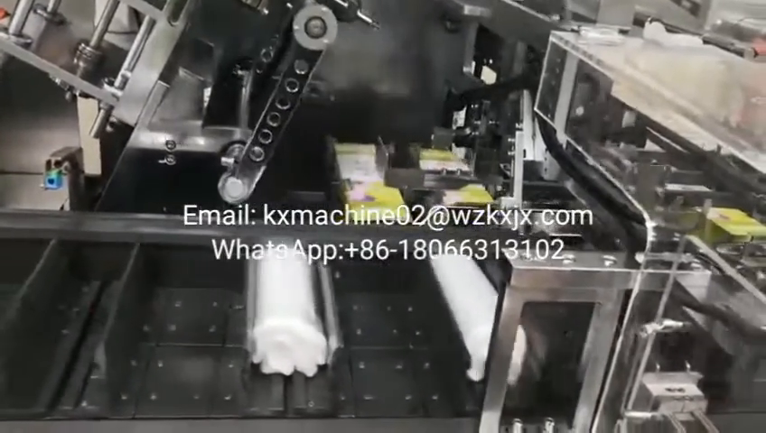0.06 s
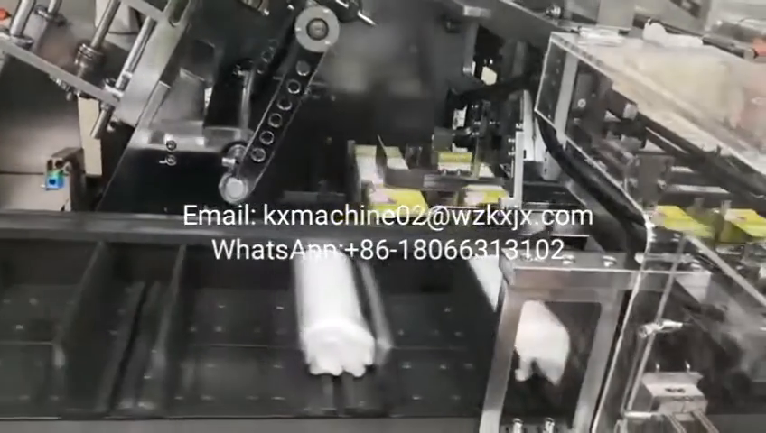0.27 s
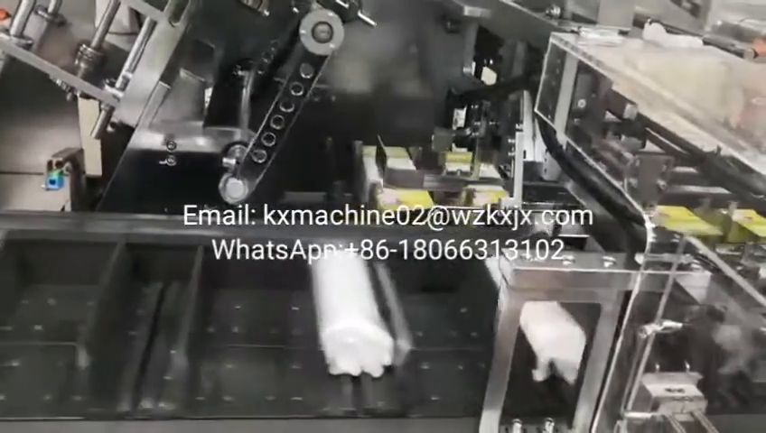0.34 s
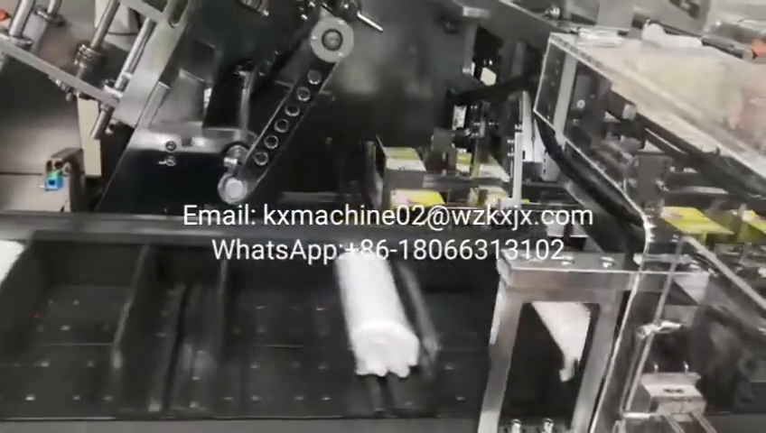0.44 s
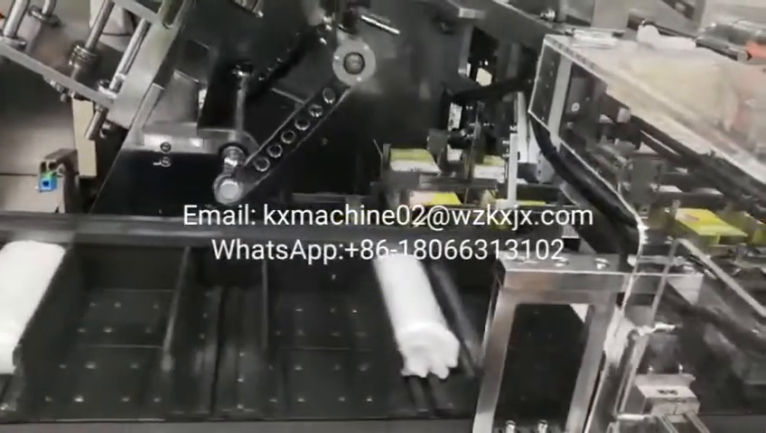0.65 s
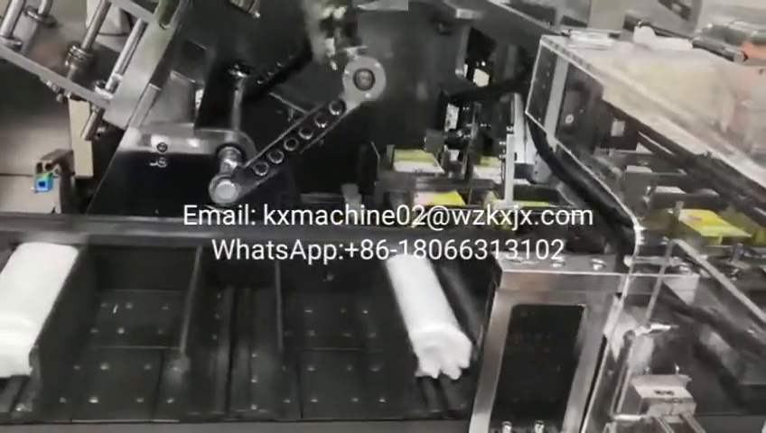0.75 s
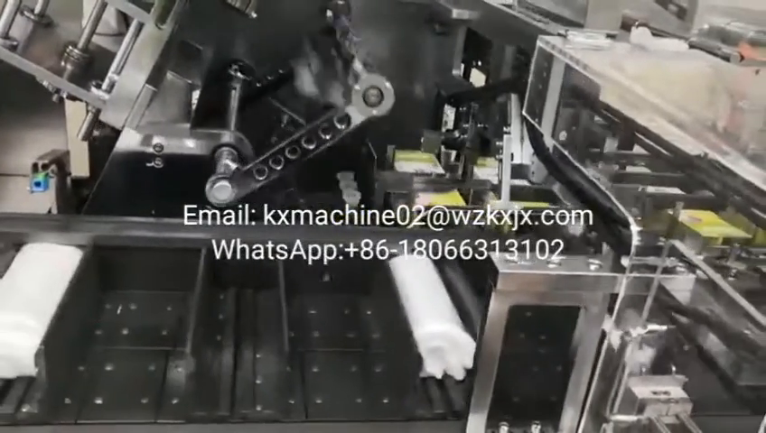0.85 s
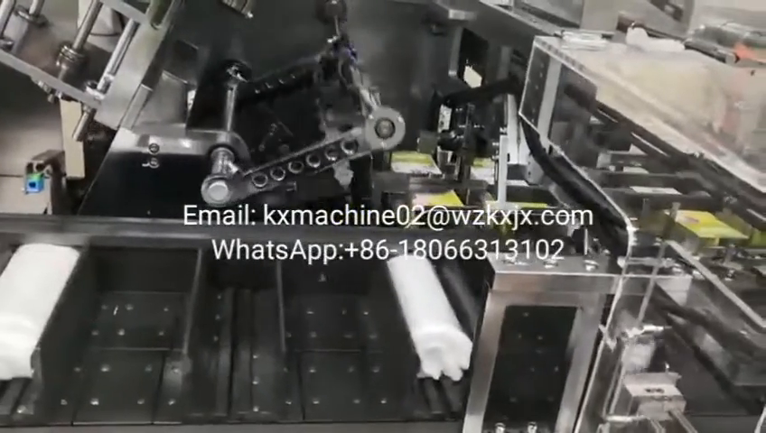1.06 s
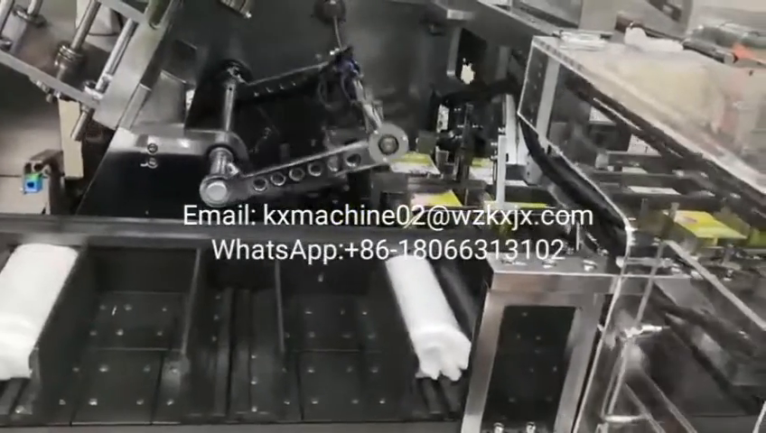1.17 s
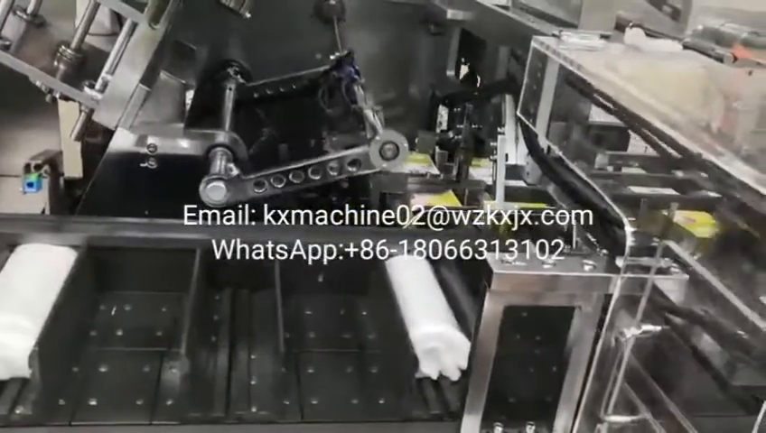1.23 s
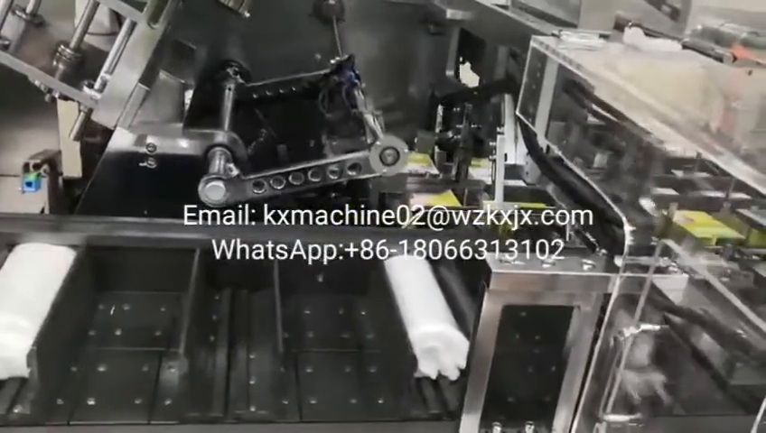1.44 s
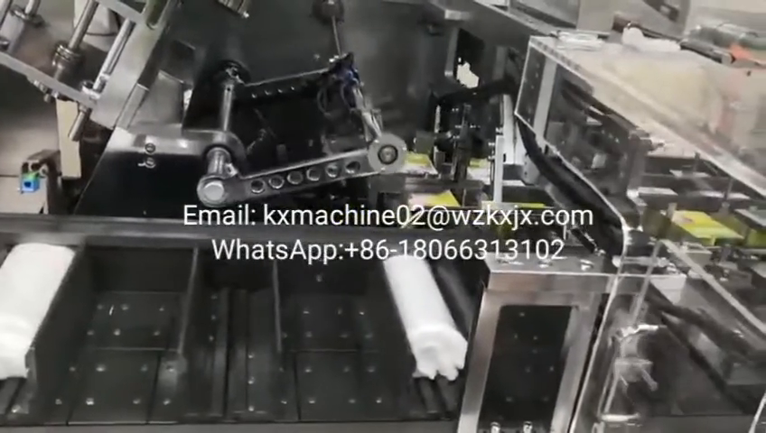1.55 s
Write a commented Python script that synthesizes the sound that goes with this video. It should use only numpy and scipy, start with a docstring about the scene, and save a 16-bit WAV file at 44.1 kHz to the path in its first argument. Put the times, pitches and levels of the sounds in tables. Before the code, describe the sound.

A packing machine runs one cycle. A carriage rolls along its rail with a dull thump, air hisses out, then a steel arm clanks, bounces and rubs briefly. A steady factory hum and thin drive whine continue underneath.

```python
"""A packing machine goes through one cycle over the steady hum and wash of a factory.
First a carriage rolls along its rail, swelling and slowing, with a dull thump of the frame.
Then a valve spits and air hisses out. A steel arm clanks on its stop, bounces and runs on briefly.
Last comes a faint leak of air, and the whine of the drive swells for a moment."""
import sys
import numpy as np
from scipy import signal
from scipy.fft import rfft, irfft
from scipy.io import wavfile
from scipy.ndimage import uniform_filter1d

SR = 44100
rng = np.random.default_rng(int(sys.argv[2]) if len(sys.argv) > 2 else 0)


def unload_wav(signal):
    """Save mono or channel-first audio to the path in sys.argv[1] as 16-bit WAV at rate SR, clipped to [-1, 1]."""
    wavfile.write(
        sys.argv[1],
        SR,
        np.round(np.clip(np.atleast_2d(signal).T, -1, 1) * 32767).astype(np.int16),
    )


N = 70560
T = np.arange(N) / SR


def amp(db):
    """Turns decibels into a number to multiply by."""
    return 10 ** (np.asarray(db) / 20)


def unit(x):
    """Scales a signal to an average power of 1."""
    return x / np.sqrt(np.mean(x ** 2) + 1e-20)


def noise():
    """Fresh white noise: an even hiss."""
    return rng.standard_normal(N)


def at_pitch(points, hz):
    """Looks up values between a table's pitches, giving each octave equal room."""
    pitches, values = np.transpose(points)
    return np.interp(np.log(hz + 1), np.log(pitches + 1), values)


def loudness(points):
    """Joins (time_s, level_db) points into a volume curve, silent before and after."""
    return amp(np.interp(T, *np.transpose(points), left=-120, right=-120))


def wander(rate_hz):
    """A smooth random wobble; a higher rate makes it quicker."""
    hz = np.fft.rfftfreq(N, 1 / SR)
    return unit(irfft(rfft(noise()) * np.exp(-(hz / rate_hz) ** 2), N))


def colour(x, points):
    """Sets the balance of low and high pitches in x, at power 1."""
    hz = np.fft.rfftfreq(N, 1 / SR)
    return unit(irfft(rfft(x) * amp(at_pitch(points, hz)), N))


def resonances(x, peaks):
    """Keeps the narrow bands of x where a part likes to ring, at power 1."""
    hz = np.fft.rfftfreq(N, 1 / SR)
    power = sum(amp(db) ** 2 / width / (1 + ((hz - pitch) / (0.74 * width)) ** 2) ** 2
                for pitch, width, db in peaks)
    return unit(irfft(rfft(x) * np.sqrt(power), N))


def decay(start_s, fade_s, rise_s):
    """A quick rise and a fall of 60 dB every fade_s seconds."""
    age = np.maximum(T - start_s, 0)
    return np.minimum(age / rise_s, 1) * 10 ** (-3 * age / fade_s)


def ring(start_s, notes, rise_s):
    """One blow sets a part's own notes ringing, each fading at its own pace."""
    size = np.sqrt(sum(amp(db) ** 2 for _, db, _ in notes) / 2)
    return sum(amp(db) * decay(start_s, fade_s, rise_s) * np.sin(2 * np.pi * (hz * T + rng.random()))
               for hz, db, fade_s in notes) / size


def tones(lines, waver_hz=3.5):
    """Steady tones that waver a little in pitch."""
    sound = np.zeros(N)
    for hz, db in lines:
        cycles = np.cumsum(hz + waver_hz * wander(14.2)) / SR + rng.random()
        sound += amp(db) * np.sqrt(2) * np.sin(2 * np.pi * cycles)
    return sound


def factory():
    """Distant machines blur into a wash, a motor hums and the drive whines."""
    # tone colour of the wash: pitch_hz, level_db
    wash_colour = [(15, -47), (25, -18.5), (45, -9), (69, -1), (110, -5), (160, -2.5), (313, -5.5),
                   (410, -11), (650, -18.5), (804, -17.5), (1170, -8.5), (1370, -11.5), (1660, -5.5),
                   (2850, -8), (3340, -7), (4300, -13.5), (5730, -21.5), (6400, -30), (7700, -40.5),
                   (8580, -54), (15500, -68)]
    # motor tones: pitch_hz, level_db
    hum_tones = [(72, -65), (134.6, -61.5), (200, -65.5), (262, -60.5), (1712, -63.5)]
    # drive tones, before the swell scales them: pitch_hz, level_db
    whine_tones = [(3285, -61.5), (3405, -46), (3467, -55)]
    bands = signal.stft(noise(), nperseg=1024, noverlap=768)[2]
    patches = uniform_filter1d(rng.standard_normal(bands.shape), size=10, axis=0)
    drift_db = 1.5 * unit(uniform_filter1d(patches, size=10, axis=1))
    room_db = 3 * rng.standard_normal((len(bands), 1))  # the room favours some pitches
    wash = signal.istft(bands * amp(drift_db + room_db), nperseg=1024, noverlap=768)[1][:N]
    swell = 0.36 + 0.44 * np.exp(-((T - 1.435) / 0.084) ** 2)  # peaks at 1.435 s
    return amp(-39.5) * colour(wash, wash_colour) + tones(hum_tones) + tones(whine_tones) * swell


def frame():
    """Soft blows knock and ring the frame, which rumbles while the drive works hard."""
    # tone colour of the rumble: pitch_hz, level_db
    rumble_colour = [(20, -28.5), (45, -8), (75, 1.5), (110, -2), (150, 0), (260, -8), (450, -32.5),
                     (1500, -66)]
    # rumble under load: time_s, level_db
    rumble_levels = [(.1, -77), (.21, -45), (.58, -56.5), (.7, -46.5), (.8, -41.5), (.9, -48), (1.03, -45),
                     (1.12, -73)]
    # tone colour of a muffled knock: pitch_hz, level_db
    knock_colour = [(30, -11), (90, 3.5), (250, -3), (400, -4), (620, -8), (900, -20), (1400, -15.5),
                    (1750, -1), (2300, -17.5), (6000, -53.5)]
    # blows on the frame: start_s, level_db
    thumps = [(0.324, -37.5), (.462, -20.5), (0.756, -40)]
    # the frame's own notes: pitch_hz, level_db, fade_s
    frame_notes = [(84, -9, 0.18), (135, -10, 0.18), (190.2, 0, .17), (204.5, -2, 0.2), (245.6, -11, 0.41),
                   (331, -14, 0.19)]
    sound = loudness(rumble_levels) * colour(noise(), rumble_colour)
    knock_noise = amp(-5) * colour(noise(), knock_colour)
    for start_s, db in thumps:
        knock = knock_noise * decay(start_s, fade_s=0.23, rise_s=0.0051)
        sound += amp(db) * (knock + ring(start_s, frame_notes, rise_s=0.0072))
    return sound


def carriage():
    """Grainy rolling rings the rail: bright as the carriage sets off, dull as it slows."""
    # tone colour of the rolling: pitch_hz, level_db
    roll_colour = [(40, -34), (140, -0.5), (260, -6.5), (450, -19.5), (800, -21), (1450, -23.5),
                   (2100, -11), (2500, 2), (4000, -2), (5500, -9.5), (6500, -20), (7700, -29),
                   (8500, -41.5), (11000, -56), (15000, -58)]
    # where the rail rings: pitch_hz, width_hz, level_db
    rail_peaks = [(1157, 110, -12.5), (1796, 143, -0.5), (2703, 190, -1), (3580, 70, -6.5), (4180, 91, -4),
                  (4730, 92, -16)]
    # speed heard as loudness: time_s, level_db
    travel_levels = [(.10, -69), (.19, -39.5), (.25, -31), (.30, -25), (.35, -22), (.42, -22), (.49, -25),
                     (.55, -30.5), (.61, -38.5), (.67, -54)]
    # boost or cut of the treble: time_s, level_db
    treble_levels = [(.09, -5), (.23, 3), (.38, 1.5), (.49, -2), (.57, -9.5), (.68, -18)]
    contact = noise() * amp(wander(500))
    rolling = amp(-1.5) * colour(contact, roll_colour) + amp(-8.5) * resonances(contact, rail_peaks)
    body = signal.sosfiltfilt(signal.butter(3, 5000, fs=SR, output="sos"), rolling)  # below 5000 Hz
    treble = (rolling - body) * loudness(treble_levels)
    return loudness(travel_levels) * (body + treble)


def air_valve():
    """Escaping air makes thin spits, a faint leak and a broad exhaust hiss."""
    # spits at the valve: start_s, level_db, fade_s
    spits = [(.134, -70, .13), (.461, -70, .13), (.7435, -56, 0.11), (.763, -47, 0.15), (0.75, -58, .07),
             (1.155, -71, .1)]
    # thin leak: time_s, level_db
    leak_levels = [(1.05, -92), (1.16, -76), (1.26, -79), (1.31, -98)]
    # tone colour of spits and leak: pitch_hz, level_db
    spit_colour = [(3000, -8.5), (7000, 0), (9000, -17), (10500, -18), (12500, -10), (14400, 1.5),
                   (15500, -5)]
    # exhaust puffs: start_s, length_s, level_db, growth_db_per_s
    puffs = [(0.139, .02, -45, -10), (0.739, 0.012, -44.5, 5), (0.757, 0.11, -34.5, 71)]
    # tone colour of the exhaust: pitch_hz, level_db
    exhaust_colour = [(600, -23.5), (1200, -5), (1750, 0), (3000, 0.5), (4500, 3), (5700, -2), (6400, -15),
                      (7900, -21.5), (8700, -33), (12000, -45.5), (15000, -41)]
    spitting = sum(amp(db) * decay(start_s, fade_s, rise_s=0.003) for start_s, db, fade_s in spits)
    thin_hiss = (spitting + loudness(leak_levels)) * colour(noise(), spit_colour)
    puff_rise_s, puff_fade_s = 0.01, 0.32
    flow = np.zeros(N)
    for start_s, length_s, db, growth in puffs:
        age = np.maximum(T - start_s, 0)
        grown_db = growth * np.minimum(age, length_s)
        faded_db = 60 * np.maximum(age - length_s, 0) / puff_fade_s
        flow += np.minimum(age / puff_rise_s, 1) * amp(db + grown_db - faded_db)
    rough_air = noise() * amp(1.2 * wander(200))
    return thin_hiss + flow * colour(rough_air, exhaust_colour)


def clank(start_s):
    """Steel hits steel: a sharp crack, then the panels and the arm ring."""
    # tone colour of the panels and the crack: pitch_hz, level_db
    panel_colour = [(100, -21), (350, -14), (620, -11.5), (950, -5), (1300, -9.5), (1750, 0.5), (2500, -1),
                    (4000, -4), (5500, -13), (7700, -24), (8600, -42), (12000, -50), (15000, -43)]
    # how long the panels ring: pitch_hz, fade_s
    panel_fades = [(300, 0.56), (700, 0.35), (2200, 0.54), (4000, 0.54), (7000, 0.28), (12000, 0.13)]
    # the arm's own notes: pitch_hz, level_db, fade_s
    arm_notes = [(945, -4, 0.066), (1023, -8, 0.25), (1672, -3, 0.28), (1682, 0.5, 0.17), (1805, 2.5, .12),
                 (1985, 2.5, 0.19), (2541, -21.5, 0.44), (2967, -1, 0.2), (3655, -5, 0.12),
                 (3825, -2, 0.28), (4510, -6, 0.19), (4440, -4, .12)]
    hz, times, bands = signal.stft(colour(noise(), panel_colour), SR, nperseg=256)
    fading = amp(-60 * np.maximum(times - start_s, 0) / at_pitch(panel_fades, hz)[:, None])
    onset = np.clip((T - start_s) / 0.0037, 0, 1)
    panels = onset * signal.istft(bands * fading, SR, nperseg=256)[1][:N]
    crack = colour(noise(), panel_colour) * decay(start_s, fade_s=0.058, rise_s=0.0006)
    return amp(-3) * crack + amp(-5.5) * panels + amp(-2.5) * ring(start_s, arm_notes, rise_s=0.00038)


def arm():
    """The arm hits its stop and bounces, and its joints rub as it runs on."""
    # blows on the stop: start_s, level_db
    blows = [(.851, -18), (0.8604, -17), (0.907, -29)]
    # where the rubbing joints ring: pitch_hz, width_hz, level_db
    joint_peaks = [(2145, 100, 2), (2460, 88, 1.5), (3340, 360, 4), (4000, 170, -8), (4270, 100, -5.5)]
    # rubbing as the arm runs on: time_s, level_db
    rub_levels = [(.88, -49), (.925, -29.5), (.975, -32.5), (1.022, -33.5), (1.045, -39.5), (1.07, -61)]
    friction = noise() * amp(2 * wander(440))
    rub = loudness(rub_levels) * resonances(friction, joint_peaks)
    return rub + sum(amp(db) * clank(start_s) for start_s, db in blows)


def scene():
    """Adds all the sources into one channel."""
    return (factory() + frame() + carriage() + air_valve() + arm())[None]


def record(dry):
    """Cuts away the very highest treble."""
    cutoff_hz = 15350
    low_pass = signal.firwin(401, cutoff_hz, window=("kaiser", 9), fs=SR)
    return signal.oaconvolve(dry, low_pass[None], "same")


dry = scene()
out = record(dry)
unload_wav(out)
```